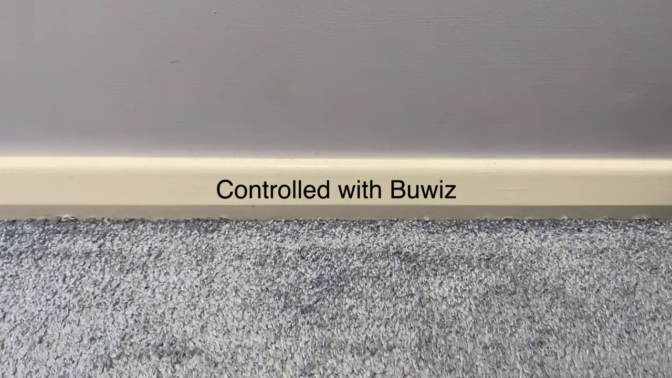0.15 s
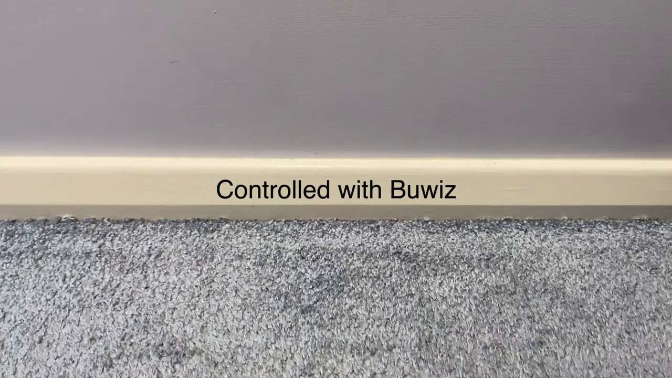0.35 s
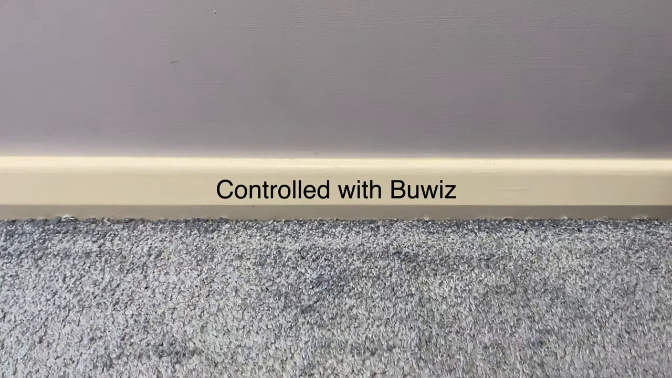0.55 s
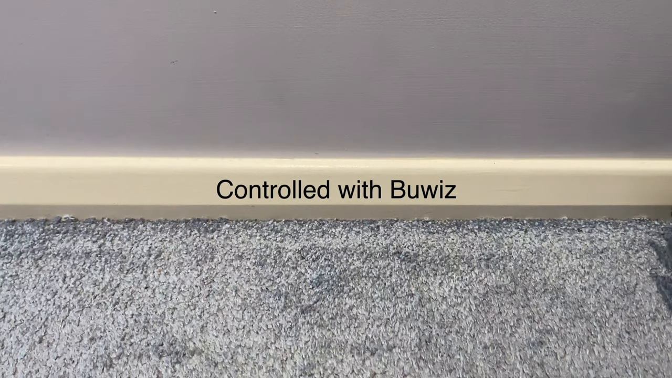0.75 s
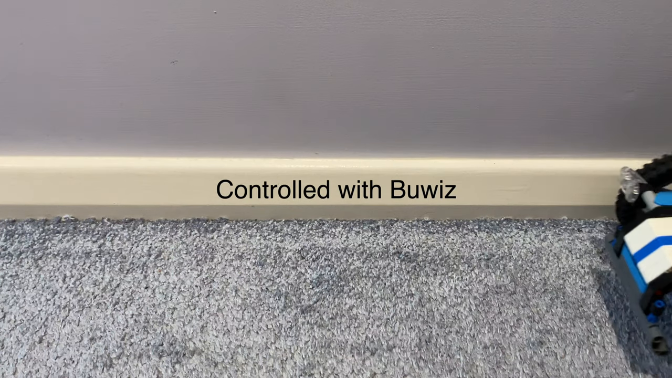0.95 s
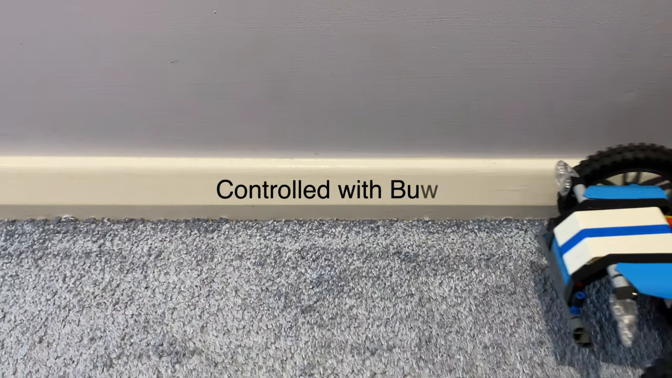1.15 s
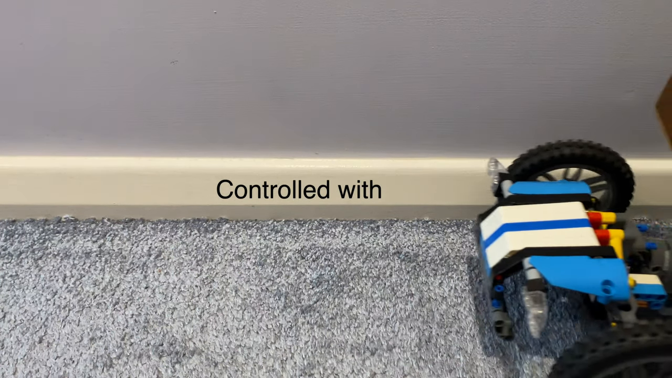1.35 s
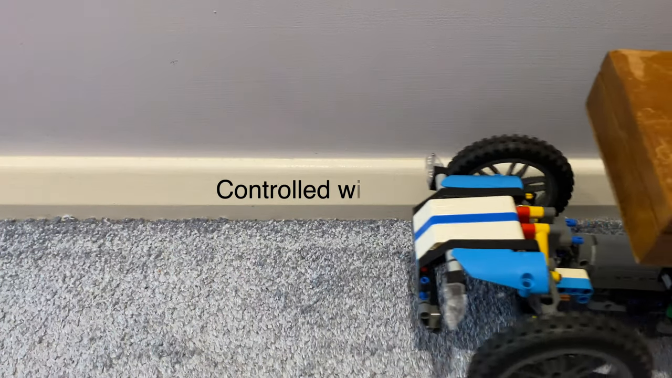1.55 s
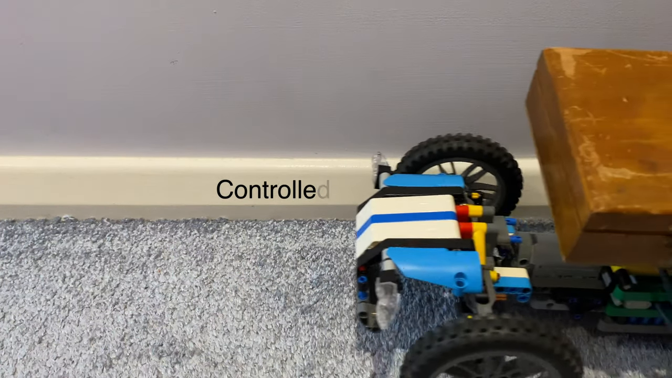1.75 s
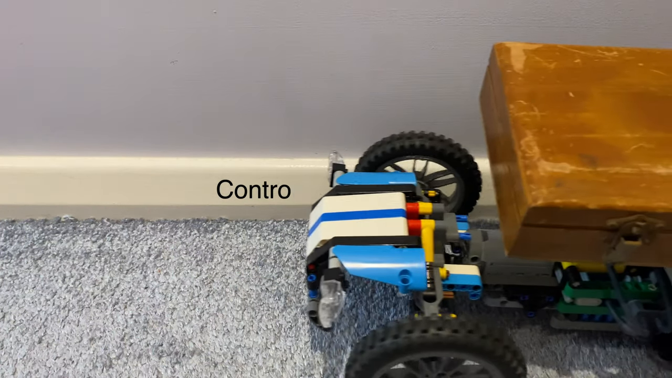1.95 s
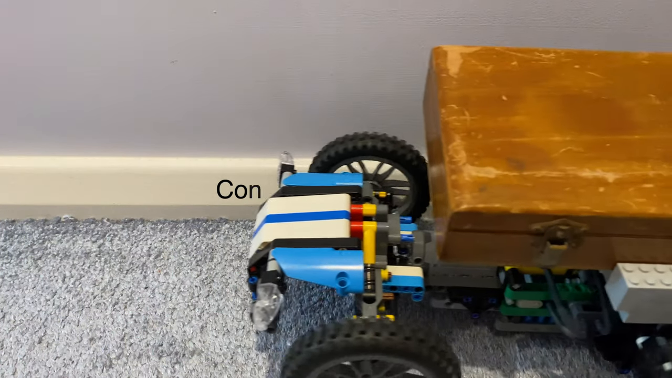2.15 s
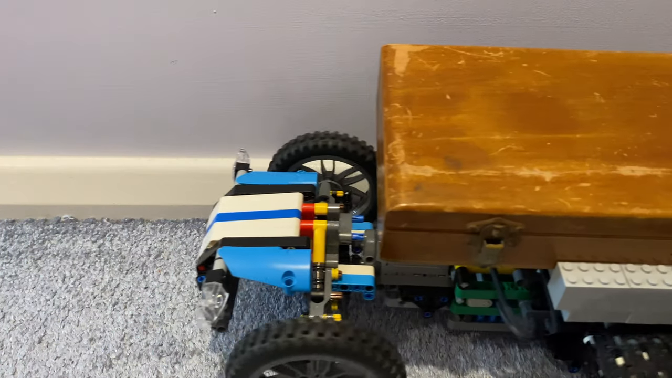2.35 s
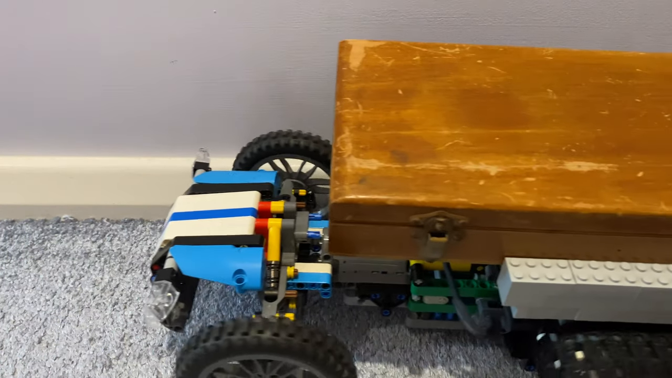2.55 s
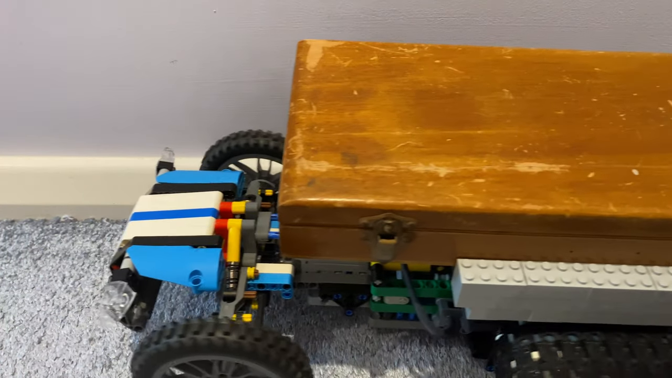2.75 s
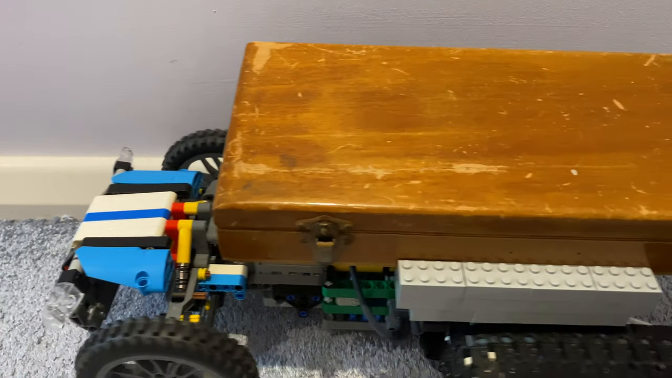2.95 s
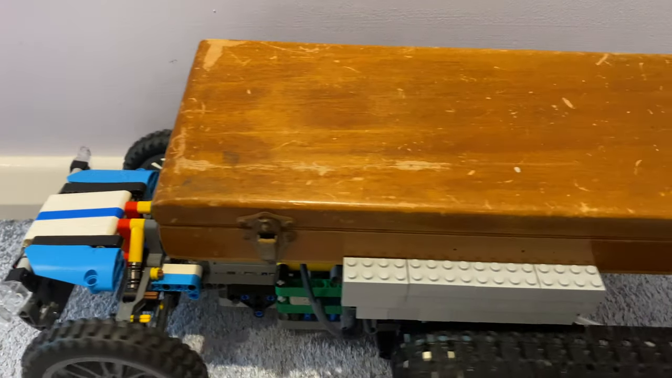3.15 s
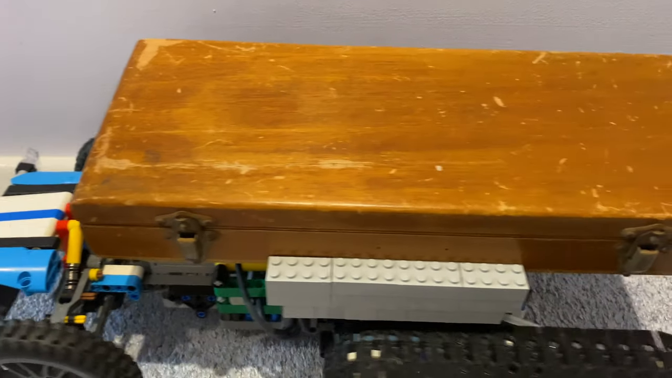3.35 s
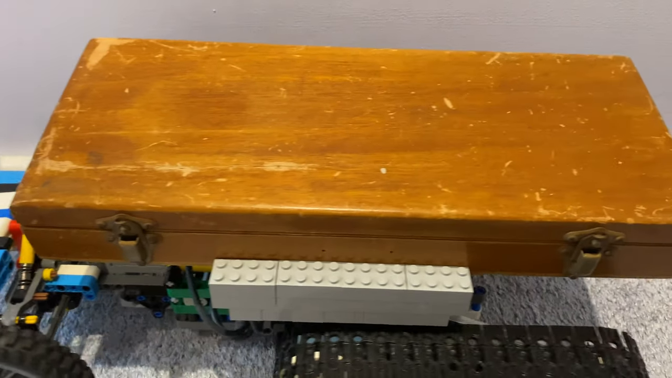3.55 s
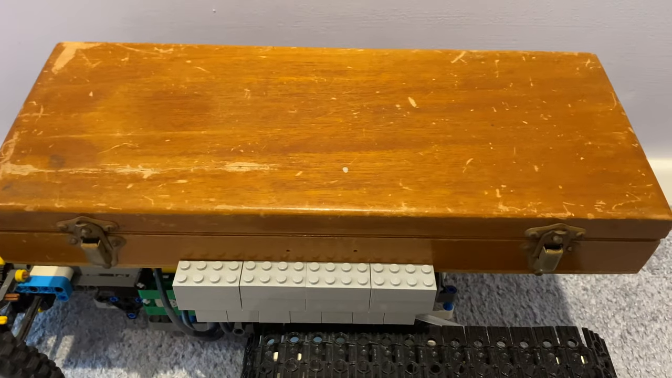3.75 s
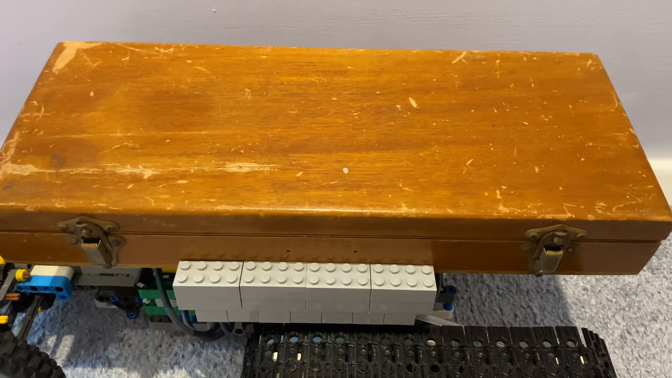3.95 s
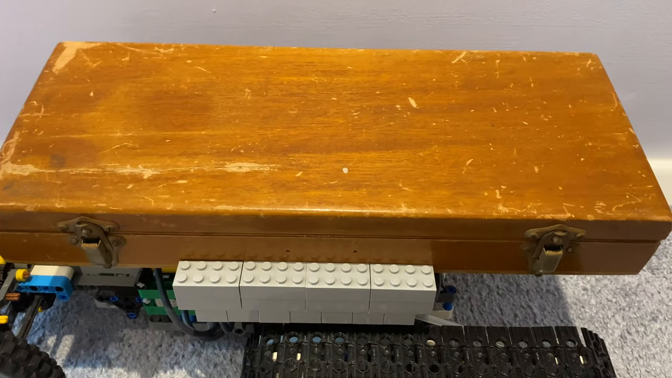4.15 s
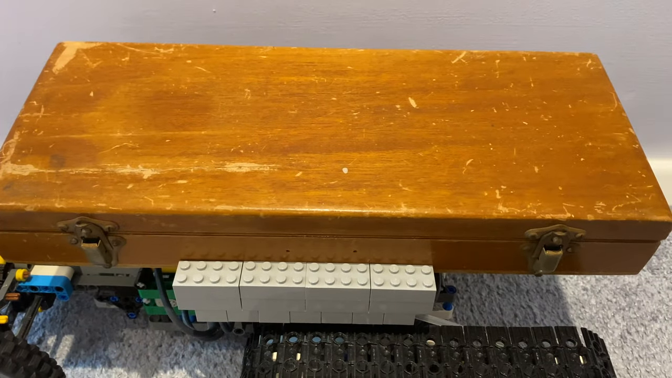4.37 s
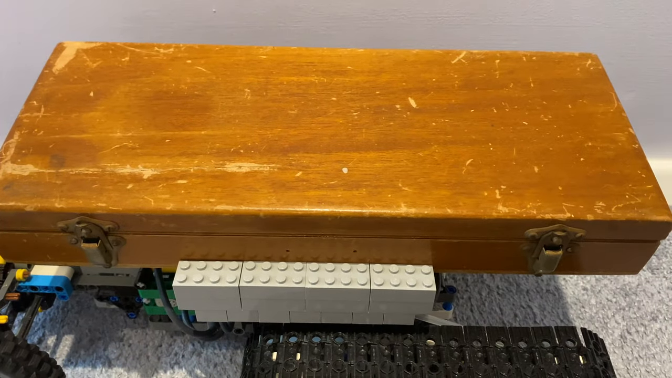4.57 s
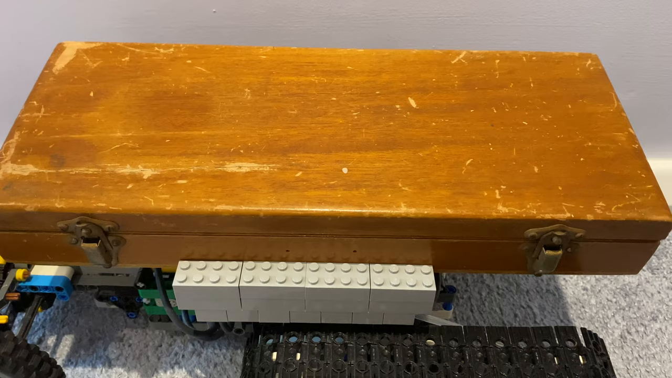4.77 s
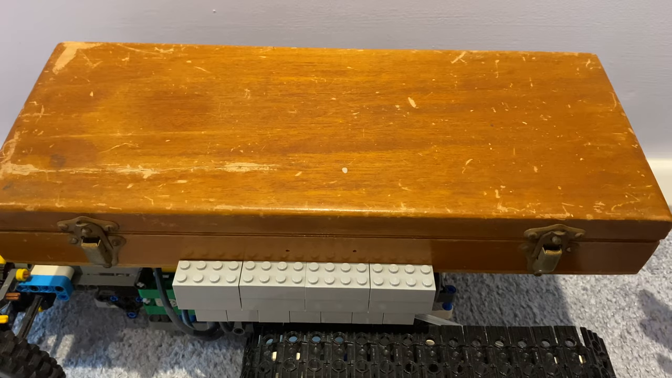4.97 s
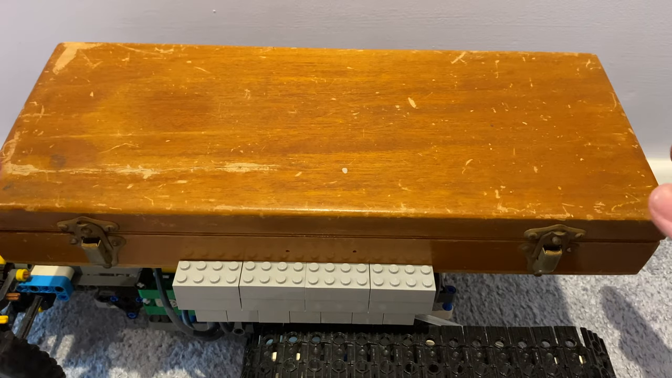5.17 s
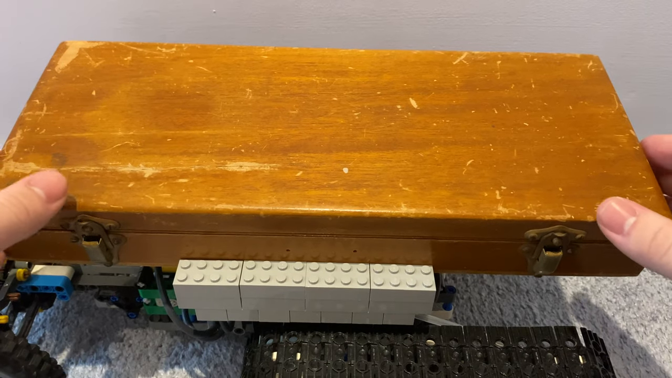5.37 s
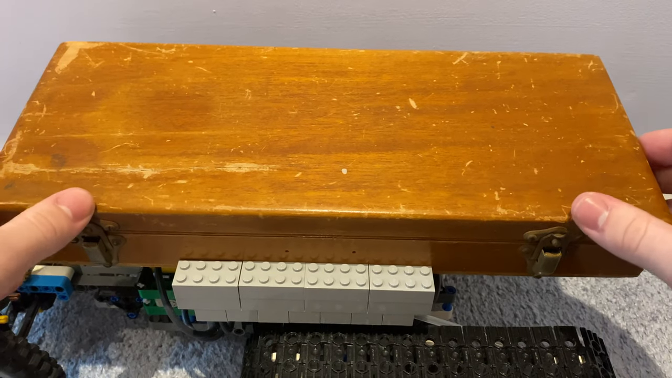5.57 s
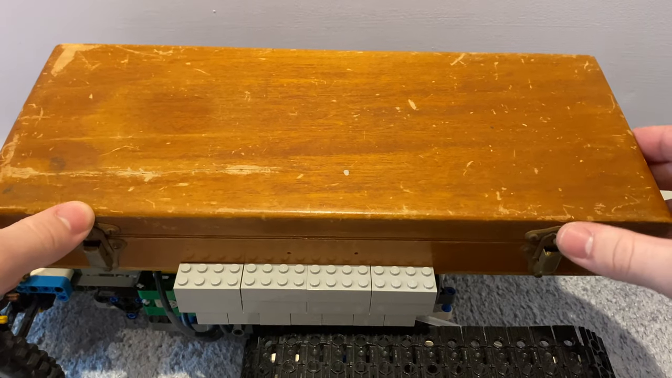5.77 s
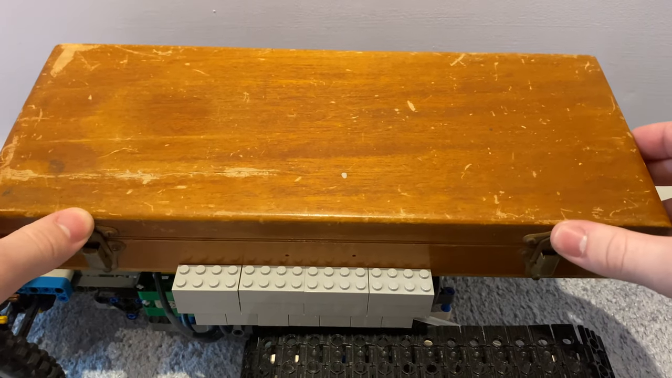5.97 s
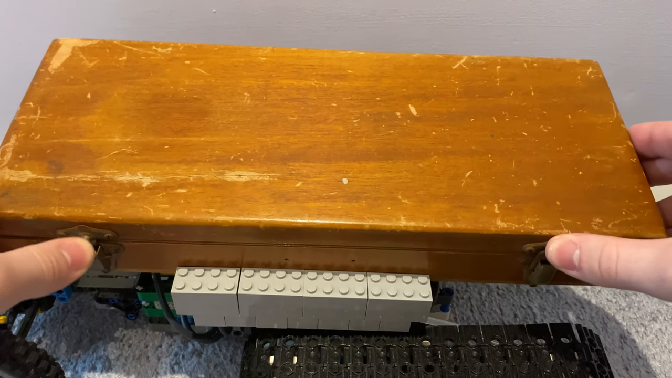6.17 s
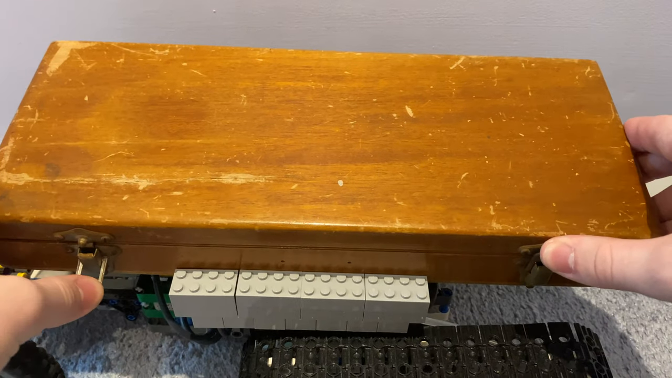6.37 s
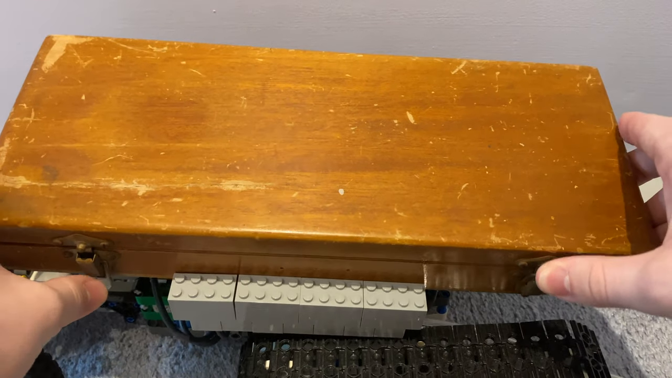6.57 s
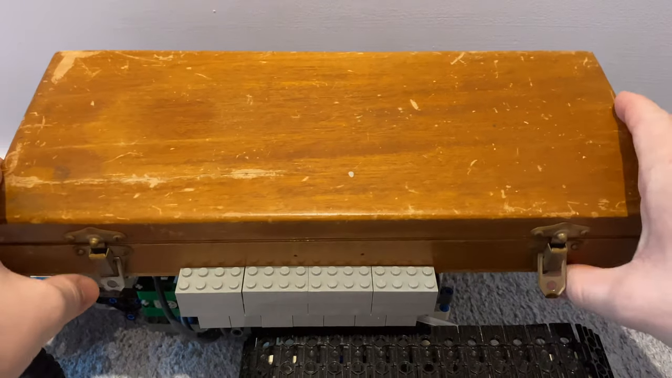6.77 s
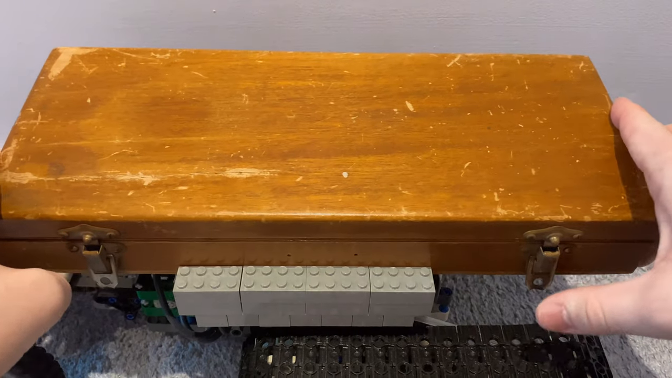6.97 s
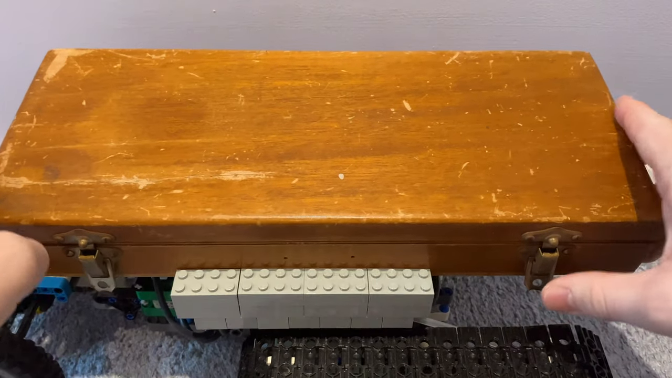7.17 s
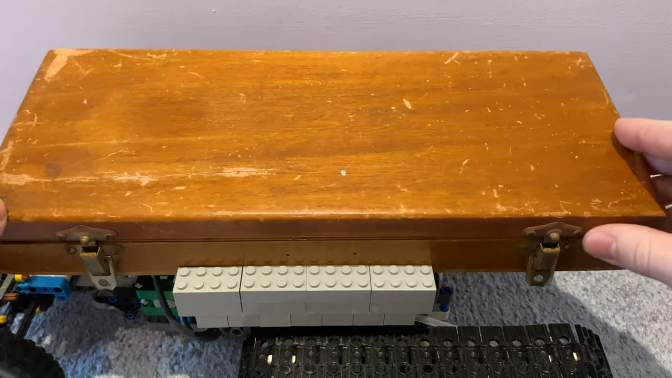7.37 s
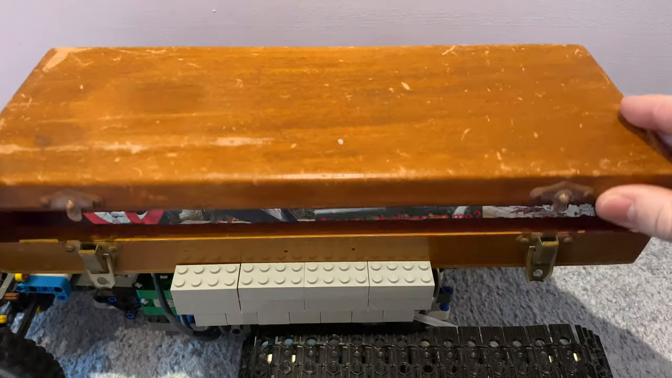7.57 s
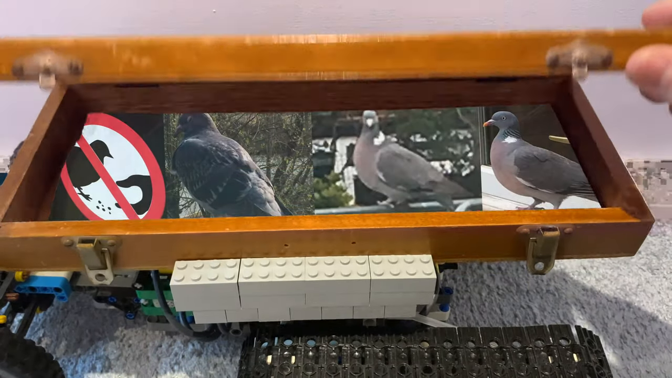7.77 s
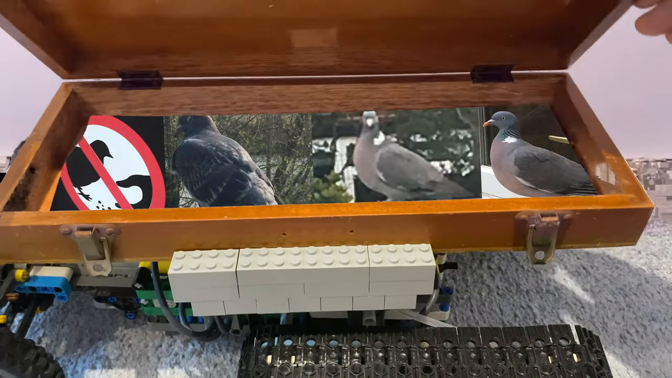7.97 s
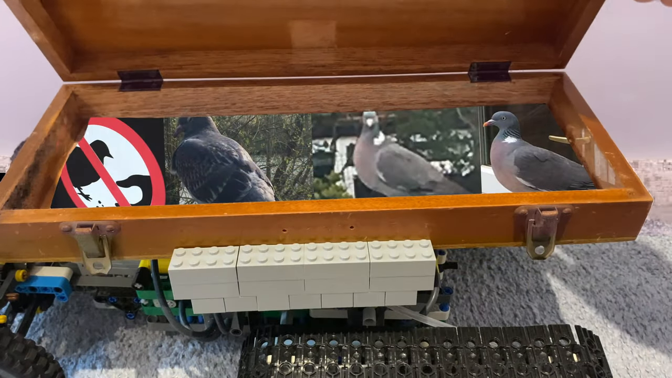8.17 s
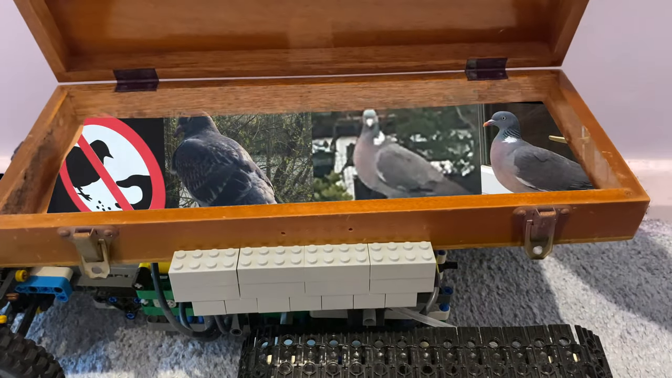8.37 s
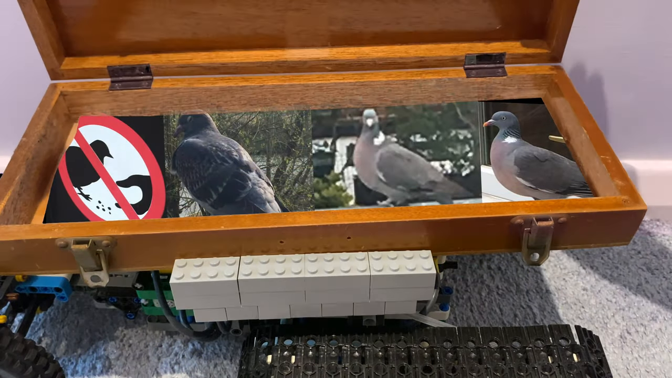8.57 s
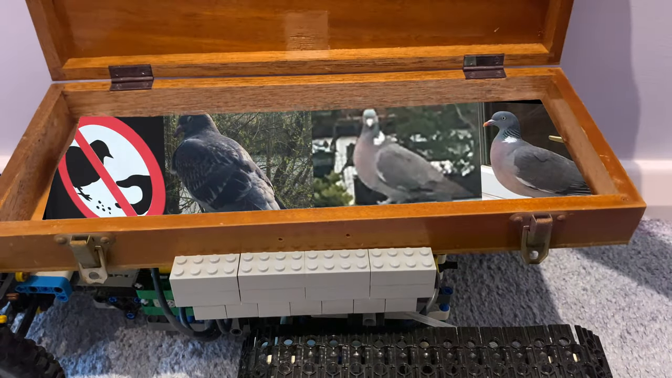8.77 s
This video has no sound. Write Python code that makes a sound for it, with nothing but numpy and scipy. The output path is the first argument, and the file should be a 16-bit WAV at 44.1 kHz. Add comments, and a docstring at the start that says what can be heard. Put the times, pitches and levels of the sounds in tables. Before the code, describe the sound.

Close phone pickup, short indoor reverberation. After a brief quiet, compressed air bursts chatter rapidly, slightly quickening then slowing, over clacking cranks, ticking gears and boxy rumble on carpet. Motion ends, leaving a thin fading hiss and two dull footfalls. Then hands knock and rub hollow wood, one latch cracks, a second follows half a second later, and a lid opens softly to near silence.

```python
"""A toy air engine's valves puff turbulent bursts as it drives a model truck over carpet; cranks clack, the frame
rattles the wooden box aboard. After the stop the leaking seal hisses on, and two shuffling steps thud and scuff.
The last air squeaks away; fingers knock and rub the box, exciting its panels. Two latches snap open in turn, chatter
over ringing plates, then the lid lifts: its cavity and hinge glide upward and the box resonates anew.
A small quiet room adds its tail and tone, heard by a phone with two microphone ports."""
import sys
import numpy as np
from scipy import signal
from scipy.fft import rfft, irfft, next_fast_len
from scipy.io import wavfile
from scipy.ndimage import uniform_filter1d, map_coordinates

SR = 44100
rng = np.random.default_rng(int(sys.argv[2]) if len(sys.argv) > 2 else 0)


def persist_wave(psi):
    """Save psi, clipped to +-1, as 16-bit WAV."""
    counts = np.round(np.clip(psi, -1, 1) * 32767).astype(np.int16)
    wavfile.write(sys.argv[1], SR, np.atleast_2d(counts).T)


N = 388962

# valve exhausts: (peak time [s], low-band level [dB], emptying time for 4 dB [ms], top band over low band [dB])
PUFFS = [(0.43, -42.5, 7, -10), (0.552, -56, 40, 0), (0.6, -53, 26, 2), (0.658, -46, 13, -16),
         (0.695, -43, 24, 0.5), (0.819, -41.5, 9, 6.5), (0.845, -44.5, 34, -29), (0.957, -43, 1, 8),
         (0.98, -37.5, 10.5, -2), (1.083, -37.5, 18.5, -3), (1.2, -44.5, 7, 4.5), (1.227, -44.5, 30, -2),
         (1.323, -49, 9.5, 14), (1.347, -41, 11, -25.5), (1.414, -52, 81, -6), (1.458, -41, 11, 4.5),
         (1.478, -41, 10.5, 3), (1.591, -38.5, 19.5, -1), (1.723, -41.5, 8, -0.5), (1.75, -41.5, 21, 2.5),
         (1.887, -42.5, 10.5, 6.5), (1.921, -41.5, 13, -8), (2.076, -42.5, 11, 8), (2.1, -36, 9.5, -2),
         (2.236, -47.5, 55, 0.5), (2.264, -37, 7, 7), (2.43, -41.5, 8, 3), (2.473, -41, 10, 2),
         (2.649, -38.5, 11.5, 6), (2.698, -44, 12, 1), (2.881, -45, 12, -1.5), (2.92, -37.5, 8, 2),
         (3.08, -42.5, 23, 0), (3.103, -39, 9.5, 9), (3.229, -57, 27, 6), (3.273, -42.5, 9, -1),
         (3.296, -43.5, 24.5, -1.5), (3.434, -41, 11, 7.5), (3.475, -39, 6, 2.5), (3.592, -61, 15, -28),
         (3.708, -56.5, 58, -0.5)]
# three noisy resonances of the jet, low, middle and top: rows of (frequency [Hz], relative density [dB per Hz])
JET = [
    [(1800, -12), (3300, -5.5), (4100, 2), (4800, 1), (5600, -15), (8000, -34.5)],
    [(4000, -24), (5400, -8), (6300, 0.5), (7500, -7), (9000, -9.5), (11000, -36)],
    [(8000, -33.5), (9500, -11.5), (11000, -1.5), (12300, 2.5), (13500, -20), (14500, -6.5), (15700, -7),
     (16200, -77)],
]
OPENS_MS = 7.5  # opening time for 4 dB when top and low bands are equal
SNAP_DB, MIDDLE_DB = 0.42, -1  # dB faster opening per dB of top band; middle band over low band


def exhaust():
    """Turbulent jet noise: a port opens fast and empties slowly, with a colour of its own for each burst."""
    power = np.zeros((3, N))
    t = np.arange(N) / SR
    for s, db, fall_ms, top_db in PUFFS:
        near = slice(round(s * SR) - SR // 5, round(s * SR) + SR // 5)
        ms = 1000 * (t[near] - s)
        opening_ms = OPENS_MS * amp(-SNAP_DB * top_db)
        drop_db = 4 * np.where(ms < 0, np.abs(ms / opening_ms) ** 3, ms / fall_ms)
        band_db = db + np.array([[0], [MIDDLE_DB], [top_db]])
        power[:, near] += amp(band_db - drop_db) ** 2
    jets = 0
    for p, band in zip(power, JET):
        turbulence = noise(colour(band), grains=6000, spread_db=1.5, patchy_db=2.5)
        jets = jets + np.sqrt(p) * flutter(180, 1.5) * turbulence
    return jets


# air escaping at a seal until the pressure is gone: (time [s], level [dB])
LEAK = [(.365, -66), (.375, -54), (.42, -54), (.5, -51.5), (0.6, -56.5), (1.76, -51), (3.5, -56.5),
        (3.94, -53.5), (5.12, -72.5), (5.45, -87.5), (5.6, -100)]
# colour of the leak: (frequency [Hz], relative density [dB per Hz])
SEAL = [(1000, -76.5), (2000, -37), (3000, -21.5), (3900, -9), (5000, -14.5), (5900, -8), (7800, -18.5),
        (9800, -15), (10500, -2.5), (12500, -4.5), (13200, -10), (13800, -7), (15000, -7), (15700, -16.5),
        (16200, -55.5)]
# narrow band at the seal that turns to a squeak: (time [s], frequency [Hz], level [dB])
WHISTLE = [(3.6, 3800, -83), (3.9, 3740, -65.5), (4.6, 3710, -71.5), (5.16, 3680, -79), (5.18, 3970, -69),
           (5.22, 3730, -65), (5.31, 3600, -75), (5.35, 3500, -88)]
LAST_AIR_S = 5.16


def leak():
    """Broadband flow noise through a narrow gap, with a whistle that grows partly tonal on the last air."""
    hiss = amp(curves(LEAK)[0]) * flutter(30, 1.6) * noise(colour(SEAL), patchy_db=2.0)
    breathy = glide(WHISTLE, width_hz=260, clear=0)
    squeaky = glide(WHISTLE, width_hz=170, clear=.3)
    return hiss + np.where(np.arange(N) / SR < LAST_AIR_S, breathy, squeaky)


# the box jolting on its bed: (time [s], relative level [dB], panel frequency [Hz])
LURCHES = [(0.687, -29.5, 450), (0.813, -41, 456), (0.867, -39, 389), (0.941, -46, 382), (0.966, -31, 274),
           (1.002, -42, 362), (1.106, -32.5, 456), (1.206, -30, 360), (1.369, -32.5, 530), (1.42, -34, 304),
           (1.463, -32, 350), (1.531, -30.5, 470), (1.571, -37, 347), (1.615, -28.5, 447),
           (1.847, -38, 414), (1.903, -29.5, 372), (2.025, -28, 302), (2.042, -34, 315),
           (2.089, -22.5, 324), (2.121, -36, 433), (2.153, -25.5, 370), (2.283, -55, 306),
           (2.508, -27, 394), (2.655, -39, 280), (2.744, -27, 335), (2.769, -39, 360), (2.825, -26, 328),
           (2.903, -30, 388), (2.927, -35, 320), (2.978, -53, 433), (3.048, -37, 290), (3.117, -29, 403),
           (3.196, -30.5, 306), (3.283, -24.5, 317), (3.329, -25.5, 294), (3.419, -51, 447),
           (3.468, -30, 310), (3.552, -31, 404)]
LURCH_RISE_S, LURCH_T60_S = 0.0025, 0.044


def lurches():
    """Transient excitation: each jolt swells and decays, and makes one panel ring; returns (jolts, bumps)."""
    jolts, bumps, t = np.zeros(N), np.zeros((2, N)), np.arange(SR // 10) / SR
    for s, db, hz in LURCHES:
        at = slice(round(s * SR), round(s * SR) + len(t))
        swell = amp(db + 2.5 - 60 * t / LURCH_T60_S) * (1 - np.exp(-t / LURCH_RISE_S))
        phase = rng.uniform(0, 2 * np.pi) + np.array([[0], [np.pi / 2]])  # the pair is a quarter turn apart
        jolts[at] += swell
        bumps[:, at] += swell * np.sin(2 * np.pi * hz * t + phase)
    return jolts, bumps


# cranks hitting their stops: (time [s], relative level [dB], ring frequency [Hz])
CLACKS = [(0.552, -45.5, 1330), (0.84, -30.5, 1475), (0.934, -41, 2730), (0.954, -47, 3940),
          (1.072, -47, 4270), (1.201, -38, 3900), (1.344, -33.5, 1477), (1.396, -34.5, 1320),
          (1.454, -52.5, 4040), (1.573, -37.5, 4270), (1.696, -32, 1260), (1.917, -28.5, 1473),
          (2.018, -48.5, 1130), (2.085, -26.5, 1330), (2.209, -38, 1310), (2.276, -29.5, 1346),
          (2.303, -33.5, 1670), (2.378, -30, 1716), (2.427, -49.5, 4180), (2.504, -34.5, 1290),
          (2.55, -28.5, 1724), (2.642, -36.5, 3050), (2.681, -26.5, 1587), (2.732, -30, 1240),
          (2.82, -31.5, 1340), (2.895, -27.5, 1325), (2.982, -28, 1123), (3.061, -34, 2460),
          (3.117, -30, 1326), (3.151, -35.5, 1080), (3.227, -31.5, 1300), (3.29, -25, 1227),
          (3.418, -38.5, 4080), (3.464, -26, 4100), (3.506, -29.5, 972), (3.588, -36.5, 966),
          (3.709, -43.5, 1300)]
SHIVER_DB, SHIVER_T60_S = -14, 0.11  # frame rattle after a clack, over the listed level


def crank_stops():
    """Impact ringing: a noisy tick, a main tone and four neighbouring pieces; returns (clacks, frame shiver)."""
    clacks, shiver, t = np.zeros((2, N)), np.zeros(N), np.arange(SR // 10) / SR
    for s, db, hz in CLACKS:
        at = slice(round(s * SR), round(s * SR) + len(t))
        parts = hz * np.exp(rng.normal(0, .45, (4, 1)))
        ring = np.sin(2 * np.pi * hz * t) + 0.26 * np.sum(np.sin(2 * np.pi * parts * t), axis=0)
        tick = 0.82 * amp(-60 * t / 0.0045) * rng.standard_normal((2, len(t)))
        clacks[:, at] += amp(db - 12.5) * (amp(-60 * t / 0.14) * ring + tick)
        shiver[at] += amp(db + SHIVER_DB - 60 * t / SHIVER_T60_S)
    return clacks, shiver


# how hard rolling shakes the truck: (time [s], level [dB])
DRIVE = [(0.43, -47), (0.455, -43), (0.54, -51), (0.71, -44.5), (1.8, -44), (3.6, -44.5), (3.71, -47),
         (3.86, -54.5), (4.01, -120)]
# frame and floor, over the shaking: (time [s], plastic clatter [dB], floor rumble [dB])
CLATTER = [(0.4, -8, -8), (0.7, -13.5, -7), (1.1, -6.5, -6), (1.75, -8, -12.5), (2.1, -6, -7.5),
           (2.7, -6.5, -13), (3.3, -4, -9), (3.7, -9.5, -13.5), (4.1, -9, 9)]
# panels and cavity of the shut box: (frequency [Hz], width [Hz], relative level [dB])
BOX = [(180, 64, -9), (213.4, 50, -5.5), (296.4, 26, 0.5), (360.3, 19, 2), (420, 25.1, 1.5), (545, 100, -6),
       (839, 46, -10.5), (883, 110, -15), (1325, 240, -19), (1600, 150, -22), (2050, 460, -33)]
# colour of the plastic frame: (frequency [Hz], relative density [dB per Hz])
PLASTIC = [(500, -5.5), (800, -8.5), (1270, -0.5), (1700, -6), (2200, -11), (3000, -12), (5000, -14),
           (9000, -31)]
# small wheels ticking: (frequency [Hz], width [Hz], relative level [dB])
GEARS = [(1780, 260, -2.5), (2670, 300, 0), (3070, 210, -8), (4190, 600, -4.5), (5350, 1200, -11)]
# floor under the carpet: (frequency [Hz], width [Hz], relative level [dB])
BOARDS = [(50, 50, -11), (86, 12, 8), (160, 14, -2)]
GEARS_DB = -8.5  # under the frame's coarse rattle
LUMPS_DB = 0.5  # how unevenly the treads roll
NEAR_S = 1.88  # two low panels of the box are heard fully once the truck is close


def rolling():
    """Forced vibration: cranks and treads drive box, frame and floor resonances with small uneven blows."""
    shake, (clatter, rumble) = amp(curves(DRIVE)[0]), amp(curves(CLATTER))
    jolts, bumps = lurches()
    clacks, shiver = crank_stops()
    near = np.clip(np.arange(N) / SR / NEAR_S, 0, 1) ** 2
    whole_box = noise(modes(BOX), grains=450, spread_db=1.5)
    thin_box = noise(modes(BOX[:1] + BOX[3:]), grains=410, spread_db=1.5)
    box_drive = amp(-1.5) * shake * flutter(14, LUMPS_DB) + 0.36 * jolts
    box = box_drive * (near * whole_box + np.sqrt(1 - near ** 2) * thin_box) + 0.78 * bumps
    rattle = noise(colour(PLASTIC), grains=1300, spread_db=1.8, patchy_db=3.0)
    ticks = amp(GEARS_DB) * noise(modes(GEARS), grains=170, spread_db=4.5)
    frame = (shake * clatter * flutter(35, 3.45) + shiver) * (rattle + ticks)
    floor = rumble * (shake * flutter(5.26, 1.0) + .5 * jolts) * noise(modes(BOARDS))
    return box + frame + clacks + floor


# latch and hinge contacts: (time [s], relative level [dB], plate index [whole part counts], chatter t60 [s])
CLICKS = [(5.335, -79, 0, .03), (5.476, -62, 1, 0.016), (5.709, -41.5, 0.82, 0.061), (5.79, -56, 0, 0.032),
          (5.87, -67, 0, 0.044), (5.99, -55, 1, 0.019), (6.043, -76, 0, .02), (6.061, -55, 0, 0.017),
          (6.246, -40, 0, 0.046), (6.388, -39.5, 0.98, 0.047), (6.5271, -1.5, 0, 0.013),
          (6.653, -28, 0, 0.024), (6.7812, -44, 0, 0.044), (6.897, -45.5, 1, 0.022), (6.929, -47, 0, 0.018),
          (6.941, -31, 1, .05), (6.9486, -2.5, 1, 0.008), (7.055, -26.5, 1, 0.016), (7.086, -39, 0, 0.0294),
          (7.19, -55.5, 1, 0.013), (7.252, -60, 1, 0.019), (7.29, -64, 1, 0.074), (7.509, -57, 0, 0.021),
          (7.568, -63, 1, 0.016), (7.603, -57.5, 0, .015), (7.853, -75, 0, 0.018), (7.924, -56, 0, 0.02)]
# modes of the two latch plates: rows of (frequency [Hz], relative level [dB], t60 [s])
LATCHES = [
    [(1569, -8.5, 0.11), (2690, -10.5, .14), (2860, -12, 0.17), (3160, -7, 0.2), (4900, -8, 0.07),
     (5210, -7, 0.07), (5640, -12.5, .1), (6100, -2.5, .1), (6323, 3.5, .05), (6690, -5, 0.088),
     (7460, -6.5, .09), (10360, -3, 0.037), (10600, -11.5, .06), (12000, -4.5, 0.028)],
    [(782, -0.5, 0.13), (1308, -6, 0.11), (2562, -13, 0.12), (2910, -12.5, 0.18), (4280, -2.5, 0.027),
     (4750, 4.5, 0.026), (6400, -10, 0.061), (7560, -9.5, .06), (7700, -18, .06), (9780, -10, .03),
     (11240, -4.5, .04), (12500, 1, .035), (14400, 5, .03), (15600, -2.5, .02)],
]
RING_DB, DAMPING_DB_PER_S = 2, -180  # plate over chatter; longer scrapes damp the plate
REBOUND_DB = 2.5  # spread of the tongue's uneven rebounds


def latches():
    """Impact and modal decay: metal chatters on metal, then the plate rings in modes of wandering phase."""
    out, t = np.zeros((2, N + SR)), np.arange(SR // 4) / SR
    for s, db, which, length in CLICKS:
        steps = np.repeat(rng.standard_normal(len(t) // 80 + 1), repeats=80)[:len(t)]
        bounces = amp(REBOUND_DB * steps * (t > .003))
        ring = 0
        for hz, level, t60 in LATCHES[int(which)]:
            drift = np.cumsum(rng.normal(0, .085, (2, len(t))), axis=1) + rng.normal(0, .8, (2, 1))
            decay = 2.6 * amp(-60 * t / 0.0089) + 0.27 * amp(-60 * t / t60)
            ring = ring + amp(level + rng.normal(0, 2.3)) * decay * np.sin(2 * np.pi * hz * t + drift)
        fade = 3.8 * amp(-60 * t / 0.003) + 1.9 * amp(-60 * t / length) + 0.19 * amp(-60 * t / 0.18)
        crack = fade * rng.standard_normal((2, len(t)))
        rise = (1 - np.exp(-t / (0.0006 + 0.035 * length))) ** 2
        plate = amp(RING_DB + DAMPING_DB_PER_S * length) * np.sqrt(bounces) * ring
        out[:, round(s * SR):][:, :len(t)] += amp(db - 8.5) * rise * (plate + bounces * crack)
    return filtered(out[:, :N], lambda f: modes([(5000, 16000, 0)])(f) / (1 + (f / 15500) ** 24))


# knocks on the box: (time [s], relative level [dB], hardness [dB], bounce over level [dB], bounce frequency [Hz])
KNOCKS = [(0.336, -73.5, 22.5, -3, 97), (0.436, -23, -13, -8.5, 214), (5.338, -34, -25, -9.5, 83),
          (5.477, -35.5, -18, -18, 161), (5.551, -46, -25, -17, 100), (5.571, -35, -11.5, -1, 160),
          (5.629, -37, -25, -4, 81.5), (5.694, -51, -20, -15, 75), (5.723, -29, -15.5, -11, 99),
          (5.807, -44, -41, 0, 97), (5.939, -40, -28, -5, 196), (5.991, -43, -8.5, -31, 200),
          (6.067, -41, -10, -12, 86), (6.137, -47, -22, -21, 73), (6.336, -39, -13, -15.5, 94),
          (6.398, -38.5, -8, -16.5, 77), (6.532, -18.5, -11.5, -18.5, 197),
          (6.604, -16.5, -36, -23.5, 91.5), (6.628, -29, -32, -20.5, 101), (6.649, -38, -4, -8, 209),
          (6.692, -27, -8, -8, 183), (6.713, -27, -19.5, -18, 194), (6.905, -39, -27.5, -6.5, 156),
          (6.952, -17.5, -13.5, -11, 219), (7.051, -21, -10, -17, 162), (7.141, -33, -12, 0, 184.4),
          (7.168, -34.5, -21, -7, 153.3), (7.245, -36, -22, -0.5, 210.7), (7.41, -41.5, -45, 10.5, 170.6),
          (7.603, -48.5, -23, -15.5, 100), (7.729, -50, -26, -26.5, 86.2), (8.068, -46, -25, -20, 73.1),
          (8.312, -54.5, -26, -16, 122.6)]
# the box with its lid lifted: (frequency [Hz], width [Hz], relative level [dB])
OPEN_BOX = [(261, 61, -3.5), (316.7, 85, 1), (421.7, 18, 5), (557, 51, -0.5), (762, 39, 1), (876, 71, -2.5),
            (1473, 710, -13.5), (2189, 980, -17.5)]
LID_OFF_S = 7.45
CONTACT_S = 0.0043  # time scale of a touch
LOW_PANELS_DB, HIGH_PANELS_DB = 19.5, 57.5  # how readily the panels take up a touch


def knocks():
    """Impulse response: a push rings low panels, its scratch the high ones, and the whole box bounces once."""
    shut, opened, hard, low = np.zeros((4, 2, N + SR))
    t = np.arange(SR // 5) / SR
    u = t / CONTACT_S
    for s, db, hard_db, low_db, low_hz in KNOCKS:
        at = slice(round(s * SR), round(s * SR) + len(t))
        touch = u * np.exp(-u) * rng.standard_normal((2, len(t)))
        touch /= np.sqrt(np.mean(np.sum(touch ** 2, axis=1)))
        push = np.exp(-t / 0.00023) * [[1], [rng.normal()]]
        struck = shut if s < LID_OFF_S else opened
        struck[:, at] += amp(db + LOW_PANELS_DB) * (1.28 * push + 1.2 * touch)
        hard[:, at] += amp(db + hard_db + HIGH_PANELS_DB) * touch
        bounce = amp(db + low_db - 60 * t / 0.065) * (1 - np.exp(-t / .004))
        low[:, at] += bounce * np.sin(2 * np.pi * low_hz * t)
    below, above = BOX[2:5], [(620, 250, -24)] + BOX[6:]
    panels = filtered(shut[:, :N], modes(below)) + filtered(opened[:, :N], modes(OPEN_BOX))
    return panels + filtered(hard[:, :N], modes(above)) + low[:, :N]


# grip on the box: (time [s], drone level [dB])
HANDS = [(5.29, -68), (5.33, -57), (5.44, -64), (5.57, -58.5), (5.75, -71), (5.86, -63.5), (5.95, -49),
         (6.1, -68), (6.3, -70), (6.5, -60), (6.7, -63), (6.84, -62.5), (6.95, -49.5), (7.1, -59),
         (7.36, -64), (7.94, -80.5), (8.82, -71.5)]
# fingers catching on the wood and sliding: (start [s], level [dB], length [s])
RUBS = [(5.307, -69.5, 0.036), (5.575, -86, 0.058), (5.687, -60, 0.074), (5.884, -67, 0.03),
        (5.979, -60, 0.023), (6.039, -58, 0.055), (6.123, -64, 0.13), (6.231, -67, 0.17),
        (6.332, -60, 0.15), (6.597, -45.5, 0.12), (6.894, -52.5, 0.13), (7.053, -60, 0.13),
        (7.244, -60, 0.084), (7.712, -72.5, 0.1), (7.849, -71, 0.15), (8.07, -74, 0.064),
        (8.195, -72, 0.049), (8.285, -73.5, 0.15)]
# weight shifts on the floor: (time [s], level [dB])
LEANS = [(5.35, -54), (5.57, -55.5), (6.06, -70), (6.4, -61.5), (6.601, -59), (6.73, -56), (6.9, -66.5),
         (7.09, -48.5), (7.3, -56.5)]
# colour of skin on wood: (frequency [Hz], relative density [dB per Hz])
RUSTLE = [(500, -8), (820, 4.5), (930, 10), (1050, -3), (1500, 0.5), (2000, -3), (3400, -16.5), (4500, -8),
          (8000, -17.5), (12000, -20), (16200, -50)]
SKIN_DB = -31.5  # steady rustle relative to the grip
LEAN_S = 0.051  # width of a weight shift


def hands():
    """Friction-driven vibration: sliding skin rustles and makes the box drone, recoloured once the lid is off."""
    grip, slides = amp(curves(HANDS)[0]), sum(stroke(*row) for row in RUBS)
    weight = sum(bell(s, db, LEAN_S) for s, db in LEANS) + amp(-18.0) * grip
    shut = noise(modes(BOX[2:5] + BOX[6:]), grains=1100, spread_db=4.0)
    opened = noise(modes(OPEN_BOX), patchy_db=1.5)
    box = np.where(np.arange(N) / SR < LID_OFF_S, shut, opened)
    drone = (grip * flutter(30, 4) + amp(3.5) * slides) * box
    skin = noise(colour(RUSTLE), grains=5200, spread_db=-5.5, patchy_db=5.5)
    return weight * noise(modes(BOARDS[:2])) + drone + (amp(SKIN_DB) * grip + slides) * skin


# the following tracks are all (time [s], frequency [Hz], level [dB])
# a short narrow band of noise near 3.3 kHz, just before the second snap
BAND_BEFORE_SNAP = [(6.86, 3300, -92), (6.89, 3350, -63), (6.93, 3300, -50), (6.947, 3400, -51),
                    (6.955, 3350, -93.5)]
# the cavity's tone as the lid opens
CAVITY = [(7.43, 165, -83.5), (7.46, 168.5, -72.5), (7.52, 230.6, -63), (7.62, 260, -66), (7.8, 289, -81),
          (7.9, 284, -86)]
# the hinge's rubbing tone
HINGE = [(7.47, 413, -86), (7.52, 489, -62.5), (7.6, 641, -63), (7.75, 759, -61), (7.85, 866, -73),
         (8.0, 913, -95), (8.04, 910, -85.5)]
# a faint high band of rustle
SWISH = [(7.95, 3940, -88), (8.2, 3900, -90), (8.32, 4180, -80), (8.6, 4400, -77.5), (8.82, 4900, -79)]
# the hinge squeaks at the end of its travel
SQUEAK = [(8.19, 1900, -95), (8.2, 1930, -71), (8.225, 1880, -81), (8.24, 1880, -96.5)]


def opening():
    """Moving narrow bands: a brief noise band before the second snap, the opening cavity, the hinge and a rustle."""
    rubs = glide(BAND_BEFORE_SNAP, width_hz=390, clear=0) + glide(CAVITY, width_hz=28, clear=0.55)
    rubs = rubs + glide(HINGE, width_hz=140, clear=.15) + glide(SWISH, width_hz=540, clear=0)
    octave_up = [(s, 2 * hz, db) for s, hz, db in SQUEAK]
    return rubs + glide(SQUEAK, width_hz=60, clear=.6) + glide(octave_up, width_hz=60, clear=.6)


# shuffling steps: (thud [s], level [dB], thud width [s], scuff [s], level [dB], scuff width [s])
STEPS = [(4.327, -39.5, 0.0083, 4.36, -54, 0.087), (5.159, -40.5, 0.017, 5.02, -51.5, 0.066)]
# colour of a scuff on carpet: (frequency [Hz], relative density [dB per Hz])
CARPET = [(100, 4), (500, 2), (1500, -7), (4000, -18.5), (10000, -28), (14000, -44), (16100, -80)]


def footsteps():
    """Impact and friction: each sole thuds at a floor resonance and scuffs the carpet."""
    thud = sum(bell(*row[:3]) for row in STEPS) * np.sin(2 * np.pi * BOARDS[1][0] * np.arange(N) / SR)
    box_jolt = bell(STEPS[0][0], -55.0, 0.049) * noise(modes(BOX[:2]))  # the first step also jolts the box
    carpet = noise(colour(CARPET), grains=2500, spread_db=-2.0, patchy_db=2.5)
    return thud + box_jolt + sum(bell(*row[3:]) for row in STEPS) * carpet


# level of the background: (time [s], level [dB])
BACKGROUND = [(0, -69), (.35, -71.5), (.6, -68), (8.82, -63)]
# colour of the background: (frequency [Hz], relative density [dB per Hz])
ROOM_TONE = [(15, -29), (30, -5), (53, 8), (102, -3.5), (242, -12.5), (887, -23), (1400, -25.5),
             (7710, -35.5), (9070, -37), (9840, -38.5), (16000, -39)]


def room_tone():
    """Stationary coloured noise under a slowly changing level."""
    return amp(curves(BACKGROUND)[0]) * flutter(8.6, 0.56) * noise(colour(ROOM_TONE))


# decay of the room: (frequency [Hz], t60 [s])
ROOM = [(200, 0.43), (2000, 0.19), (6000, 0.16), (14000, 0.05045)]


def walls(x):
    """Reverberation: a diffuse tail in which each frequency decays at its own rate."""
    hz, t, z = signal.stft(rng.standard_normal((2, SR // 2)), SR, nperseg=256)
    tail = signal.istft(z * amp(-60 * t / along(ROOM, hz)[:, None]), SR, nperseg=256)[1]
    late = np.pad(x, ((0, 0), (200, 0)))  # samples before the first reflection
    return signal.fftconvolve(late, tail / np.linalg.norm(tail[0]), axes=1)[:, :N]


# likeness of the two ports: (frequency [Hz], correlation [0 to 1])
ALIKE = [(60, .93), (300, 0.97), (700, 0.1), (3000, 0.32), (5500, 0.1), (8000, 0.69), (15000, 1)]
# phase of left behind right: (frequency [Hz], lag [rad])
LAG = [(60, 0.69), (400, 0.63), (1000, 1.3), (2200, 1.8), (3500, 1.78), (7000, 1), (9000, 3), (11200, 7.1),
       (13300, 8.66), (15000, 11.5), (17000, 9.5)]
# tonal difference of the ports: (frequency [Hz], left over right [dB])
BASS_LEFT = [(100, -1.5), (300, -3), (700, 0.5), (2000, 0)]


def ports(pair, pan_db):
    """Interchannel coherence: two unrelated versions mix into left and right of set likeness, lag and balance."""
    def mid_side(hz):
        turn = np.arccos(np.clip(along(ALIKE, hz), -1, 1)) / 2
        return np.array([np.cos(turn), np.sin(turn)])

    def difference(hz):
        lag = np.exp(np.outer([-.5j, .5j], along(LAG, hz)))
        return lag * amp(np.outer([.5, -.5], along(BASS_LEFT, hz)))

    mid, side = filtered(pair, mid_side)
    both = filtered(np.array([mid + side, mid - side]), difference)
    return both * amp(np.outer([.5, -.5], pan_db))


def amp(db):
    """Logarithmic level: the gain of a value in dB."""
    return 10 ** (np.asarray(db) / 20)


def unit(x):
    """Root-mean-square normalisation: x at rms 1."""
    return x / np.sqrt(np.mean(x ** 2) + 1e-20)


def along(points, hz):
    """Logarithmic frequency: interpolates (Hz, value) points on a log axis."""
    f, v = np.transpose(points)
    return np.interp(np.log(hz + 1), np.log(f + 1), v)


def curves(rows):
    """Piecewise-linear envelope: one value per sample for each column after the time, -120 outside the table."""
    s, *cols = np.transpose(rows)
    return [np.interp(np.arange(N) / SR, s, c, -120, -120) for c in cols]


def filtered(x, response):
    """Linear filtering: the spectrum of x times a complex response of frequency."""
    m = next_fast_len(N + SR // 2)
    return irfft(rfft(x, m) * response(np.fft.rfftfreq(m, 1 / SR)), m)[..., :N]


def colour(points):
    """Spectral shaping: a response that follows a spectrum table."""
    return lambda hz: amp(along(points, hz))


def modes(table):
    """Modal superposition: the causal response of damped resonances with alternating signs."""
    def response(f):
        total = 0
        for k, (c, w, db) in enumerate(table):
            total = total + (-1) ** k * amp(db) * 1j * f * w / (c * c - f * f + 1j * f * w)
        return total
    return response


def noise(response, grains=0., spread_db=0., patchy_db=0.):
    """Random excitation: two unrelated noises of rms 1, lumpy by grains a second, with a patchy moving colour."""
    x = rng.standard_normal((2, N))
    if grains:
        strength = amp(spread_db * np.minimum(rng.exponential(size=N), 3.5))
        x = x * (rng.random(N) < grains / SR) * strength
    if patchy_db:
        z = signal.stft(x, nperseg=256)[2]
        field = uniform_filter1d(rng.standard_normal(z.shape[1:]), size=2, axis=0)
        field = uniform_filter1d(field, size=7, axis=1)
        x = signal.istft(z * amp(patchy_db * unit(field)), nperseg=256)[1][:, :N]
    return unit(filtered(x, response))


def flutter(rate, depth_db):
    """Amplitude modulation: a smooth random gain, rate knots a second."""
    knots = rng.standard_normal(int(N * rate / SR) + 4)
    return amp(depth_db * map_coordinates(knots, [np.arange(N) * rate / SR]))


def glide(table, width_hz, clear):
    """Frequency glide: a moving carrier, partly a clear tone and partly a narrow band of noise."""
    hz, db = curves(table)
    fuzz = noise(lambda f: 1 / (1 + (f / width_hz) ** 2))
    return amp(db) * (clear + fuzz) * np.sin(2 * np.pi * np.cumsum(hz) / SR)


def bell(s, db, length):
    """Symmetric envelope: a swell centred on s."""
    return amp(db) * np.exp(-.5 * np.abs((np.arange(N) / SR - s) / length) ** 3)


def stroke(s, db, length):
    """Friction envelope: catches quickly at s, holds, then fades out around length."""
    u = np.maximum(np.arange(N) / SR - s, 0)
    return amp(db) * (1 - np.exp(-u / .004)) * np.exp(-(u / length) ** 3)


# balance of the whole scene: (time [s], left over right [dB])
AIM = [(0, 1.5), (.6, -2), (3.4, 0.5), (4.6, 0.5), (7.3, 0.5), (8.82, 4)]


def scene():
    """Superposition: truck, box, person and background meet at the ports, the first two with the room's tail."""
    truck, metal, wood = exhaust() + leak() + rolling(), latches(), knocks()
    far = amp(-8.0) * truck + amp(-8.0) * metal + amp(-9.5) * wood
    person = hands() + opening() + footsteps()
    return ports(truck + metal + wood + walls(far) + person + room_tone(), curves(AIM)[0])


PEAK, TOP_HZ = .9, 17100  # ceiling of the soft limit; upper band limit


def record(dry):
    """Band-limiting and soft saturation: the phone drops deep bass, rounds off peaks and cuts the extreme treble."""
    x = filtered(dry, lambda hz: (1j * hz / (48 + 1j * hz)) ** 2)
    x = x / (1 + np.abs(x / PEAK) ** 4) ** (1 / 4)
    return filtered(x, lambda hz: hz < TOP_HZ)


dry = scene()
out = record(dry)
persist_wave(out)
```